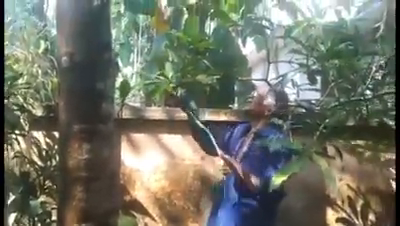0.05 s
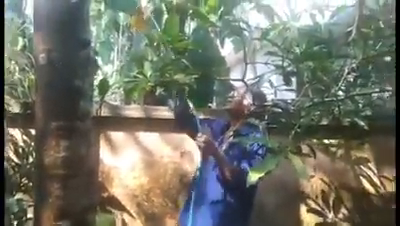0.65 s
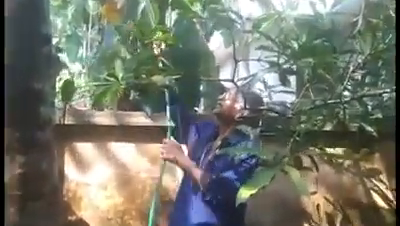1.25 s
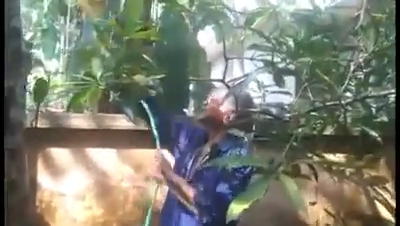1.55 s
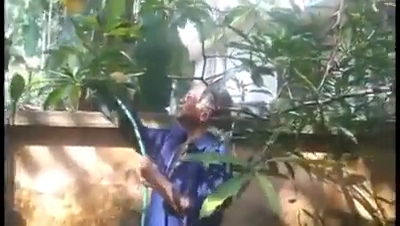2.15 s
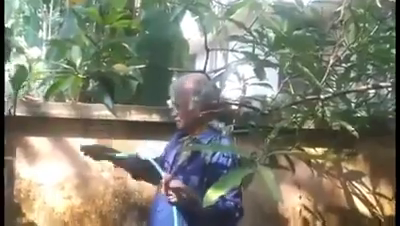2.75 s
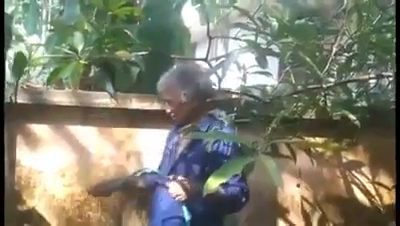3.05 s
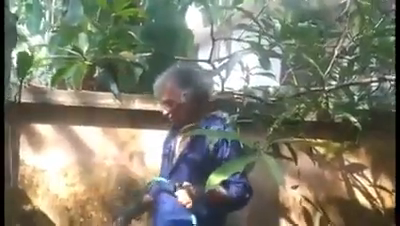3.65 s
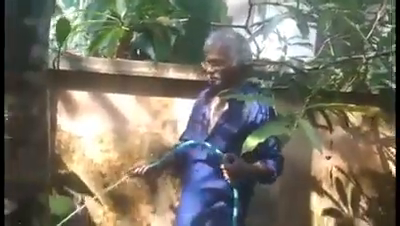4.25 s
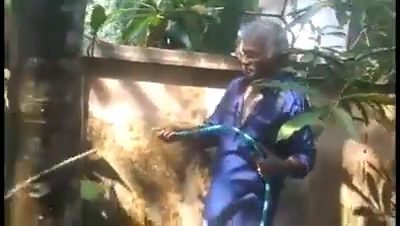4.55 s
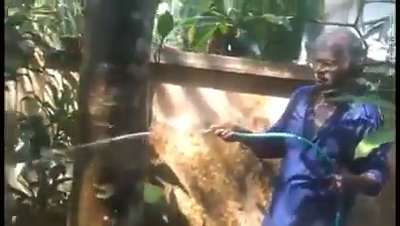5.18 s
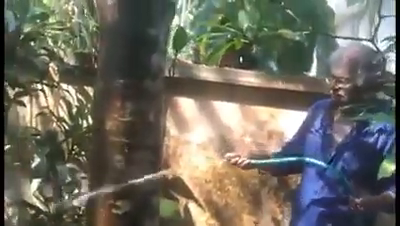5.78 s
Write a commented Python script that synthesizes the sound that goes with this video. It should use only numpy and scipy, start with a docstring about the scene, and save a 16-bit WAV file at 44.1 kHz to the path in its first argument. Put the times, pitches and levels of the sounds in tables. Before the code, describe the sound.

A hose jet sweeps across garden plants, with scattered drips and splats growing into a fuller hissing patter on foliage.

```python
"""In a garden, a thumb-pinched hose sweeps over shrubs, the ground and a tree trunk.
The spray swells on each plant and thins in the gaps; when it points high only a few drops land.
Drops patter and drum on leaves, drips plink, and lumps of water slap leaves and bark and burst
into droplets. The jet sizzles with a wandering hollow ring, over a faint outdoor rumble."""
import sys
import numpy as np
from scipy import signal
from scipy.fft import rfft, irfft
from scipy.io import wavfile

SR = 44100
rng = np.random.default_rng(int(sys.argv[2]) if len(sys.argv) > 2 else 0)


def digitize_waveform(pressure):
    """Quantize a signal to 16-bit integers and store it at the path in sys.argv[1].

    Rows of a 2-D input are taken as channels; values are limited to [-1, 1].
    """
    field = np.atleast_2d(pressure).T
    bounded = np.clip(field, -1, 1)
    quanta = np.round(bounded * 32767).astype(np.int16)
    wavfile.write(sys.argv[1], SR, quanta)


N = 265482
TIME = np.arange(N) / SR


def from_db(db):
    """Decibels to gain."""
    return 10 ** (np.asarray(db) / 20)


def rms_one(x):
    """Scale to unit power."""
    return x / np.sqrt(np.mean(x ** 2) + 1e-20)


def power_sum(*gains):
    """Unrelated sounds add in power."""
    return np.sqrt(sum(g ** 2 for g in gains))


def automation(rows):
    """One curve per column, ramped between the times in the first column."""
    times, *columns = np.transpose(rows)
    return [np.interp(TIME, times, column) for column in columns]


def drift(rate_hz):
    """Random modulation with unit power."""
    knots = rng.standard_normal(4000)
    return rms_one(np.interp(TIME * rate_hz, np.arange(len(knots)), knots))


def colour(x, spectrum):
    """Minimum-phase EQ through (frequency [Hz], gain [dB]) points."""
    hz, db = np.transpose(spectrum)
    size = 4096
    grid_hz = np.maximum(np.arange(size // 2 + 1) * SR / size, 1)
    gain = from_db(np.interp(np.log(grid_hz), np.log(hz), db))
    cepstrum = irfft(np.log(gain))
    cepstrum[1:size // 2] *= 2
    cepstrum[size // 2 + 1:] = 0
    return signal.fftconvolve(x, irfft(np.exp(rfft(cepstrum))))[:len(x)]


def resonance(x, hz, width_hz):
    """Two-pole band-pass with unity gain at its peak."""
    r = np.exp(-np.pi * width_hz / SR)
    feedback = [1, -2 * r * np.cos(2 * np.pi * hz / SR), r * r]
    return signal.lfilter(np.array([1, 0, -1]) * (1 - r * r) / 2, feedback, x + 1e-18)


def swept_resonance(x, centre_hz, width_hz):
    """A band-pass whose centre moves."""
    turn = np.exp(2j * np.pi * np.cumsum(centre_hz) / SR)
    r = np.exp(-np.pi * width_hz / SR)
    return 2 * np.real(turn * signal.lfilter([1 - r], [1, -r], x / turn))


def high_pass(x, hz, order):
    """Butterworth low cut."""
    return signal.sosfilt(signal.butter(order, hz, "high", fs=SR, output="sos"), x)


def drops(per_s, spread_db, size):
    """Clicks at random times, with random strength and polarity."""
    out = np.zeros(size)
    hits = np.flatnonzero(rng.random(size) < per_s / SR)
    weight = np.minimum(rng.exponential(1, size)[hits], 4.5)
    out[hits] = from_db(spread_db * weight) * np.where(rng.random(size)[hits] < .5, -1, 1)
    return out


def shower(spectrum, per_s, spread_db, q, clump_db, count):
    """Drops arrive in clumps and each rings briefly at one of `count` pitches."""
    pitches = np.geomspace(spectrum[0][0], min(spectrum[-1][0], SR / 3), count)
    rings = sum(resonance(drops(per_s / count, spread_db, N), hz, hz / q) for hz in pitches)
    clumps = from_db(clump_db * (0.58 * drift(90) + 0.32 * drift(24)))
    return rms_one(colour(rings, spectrum) * clumps)


# EQ of the outdoor bed: (frequency [Hz], gain [dB])
RUMBLE_EQ = [(20, -9), (35, -3), (50, 2), (66, 7.5), (100, -1.5), (150, -3.5), (250, -10.5), (500, -17.5),
             (1000, -15), (2000, -18.5), (5000, -41), (12000, -28)]
def outdoor_rumble(start_db=-72, fade_db_per_s=-0.98):
    """A faint bed of low noise that slowly dies down."""
    bed = rms_one(colour(rng.standard_normal(N), RUMBLE_EQ))
    return from_db(start_db + fade_db_per_s * TIME) * bed


def garden_echoes(x, t60):
    """Short scattered echoes from wall, trunks and leaves."""
    t = np.arange(SR // 2) / SR
    echoes = drops(3300, 0.3, len(t)) * np.exp(-np.log(1000) * t / t60) * (t > .003)
    return signal.fftconvolve(x, echoes / np.sqrt(np.sum(echoes ** 2)))[:N]


# plinks of drips and thuds of big leaves: (time [s], pitch [Hz], relative level [dB], t60 [s])
PLOPS = [(0.051, 182, -55.5, 0.47), (0.111, 269, -50.5, 0.19), (0.408, 2290, -26.5, 0.07),
         (0.42, 2390, -37, 0.12), (0.601, 192.5, -51.5, 0.21), (0.737, 3225, -28.5, 0.029),
         (0.761, 197, -58.5, 0.15), (1.002, 215, -56, 0.072), (1.178, 1450, -53, 0.14),
         (1.289, 1336, -58, 0.12), (1.317, 359, -55, 0.067), (1.705, 1670, -37.5, 0.05),
         (2.245, 174, -38, 0.042), (3.748, 585, -37.5, 0.12), (4.806, 263, -38.5, 0.14),
         (4.814, 504, -45, 0.15), (5.189, 307, -41.5, 0.16), (5.558, 340, -49, 0.088)]
def plops(rise_per_s=0.5, attack_s=0.0046):
    """A damped tone creeps up in pitch, half buried in the churn of its own splash."""
    out = np.zeros(N + SR)
    t = np.arange(SR // 4) / SR
    for s, hz, db, t60 in PLOPS:
        i = round(s * SR)
        envelope = np.exp(-np.log(1000) * t / t60) * (1 - np.exp(-t / attack_s))
        tone = np.sin(2 * np.pi * np.cumsum(hz * (1 + rise_per_s * t)) / SR)
        churn = resonance(rng.standard_normal(len(t)), hz, 60 + hz / 7)
        churn = rms_one(resonance(churn, hz, 150 + hz / 3))
        out[i:i + len(t)] += from_db(db) * envelope * (.55 * tone + .42 * churn)
    return out[:N]


# the jet's hollow ring: (time [s], upper pitch [Hz], relative level [dB], lower band re upper [dB])
JET_RING = [(3.1, 1880, -82, -6), (3.2, 1900, -49.5, 4), (3.3, 1870, -42, -6.5), (3.44, 1827, -40, -14),
            (3.54, 2090, -45, -15), (3.66, 2120, -42.5, -24), (3.72, 2120, -57, -25), (3.83, 1744, -37, -5),
            (4.02, 1820, -42, -9), (4.2, 1893, -47.5, -4.5), (4.4, 2007, -41.5, -1.5),
            (4.58, 1930, -37.5, -11), (4.66, 1900, -45, -29), (4.83, 1824, -38, -7),
            (5.33, 2020, -56.5, -8), (5.43, 1770, -44, -11), (5.53, 1950, -40.5, -9),
            (5.63, 1714, -47.5, -19), (5.82, 1840, -52, -20), (5.9, 1943, -44.5, -14), (5.95, 1860, -42, 2),
            (6.02, 1810, -46, 2)]
def jet_ring(lower_ratio=0.76, waver=.012, flutter_db=.8, flutter_hz=70):
    """The breaking jet rings in two moving bands; each wavers in pitch and flutters in level."""
    centre_hz, level_db, lower_db = automation(JET_RING)
    ring = 0
    for ratio, db in ((1, 0), (lower_ratio, lower_db)):
        fizz = drops(5000, 2.8, N)
        pitch_hz = ratio * centre_hz * (1 + waver * drift(flutter_hz))
        for width_hz in (160, 340, 600):
            fizz = swept_resonance(fizz, pitch_hz, width_hz)
        ring = ring + from_db(db + flutter_db * drift(flutter_hz)) * rms_one(fizz)
    return ring * from_db(level_db - 9.5) * (TIME > JET_RING[0][0])


# the jet on leaves, ground and bark: (peak time [s], rise [s], fall [s], level [dB], centre [Hz])
SIZZLES = [(1.61, 0.03, 0.068, -56, 3950), (3.56, 0.019, 0.026, -41, 4170),
           (3.675, 0.084, 0.034, -42.5, 4700), (4.0, 0.11, 0.033, -44, 3695), (4.6, 0.039, 0.16, -51, 4060),
           (5.72, 0.1, 0.16, -52, 3450)]
def sizzle(q=2.35):
    """Where the jet lands unbroken, a dense crackle swells in one bright band."""
    out = 0
    for s, rise_s, fall_s, db, hz in SIZZLES:
        crackle = resonance(resonance(drops(6000, 0.67, N), hz, hz / q), hz, 2 * hz / q)
        from_peak = (TIME - s) / np.where(TIME < s, rise_s, fall_s)
        out = out + rms_one(crackle) * from_db(db - 10 * from_peak ** 2)
    return out


# modes of a struck leaf: (frequency [Hz], level re the slap [dB], t60 [s])
LEAF_MODES = [(2250, -18, .045), (2620, -14, .05), (3280, -16, .045), (3950, -18, .035), (7300, -24, .04)]
def leaf_ring(t, spread_db=3.5, attack_s=.0012):
    """A leaf's modes differ from hit to hit and swell as the water spreads."""
    size = 1 + .06 * rng.standard_normal()
    ring = 0
    for hz, db, t60 in LEAF_MODES:
        polarity = rng.choice([-1, 1])
        decay = from_db(db + spread_db * rng.standard_normal() - 60 * t / t60)
        ring = ring + polarity * decay * np.sin(2 * np.pi * hz / size * t)
    return ring * (1 - np.exp(-t / attack_s))


# lumps of water hitting leaves and bark, with relative levels:
# (time [s], hit [dB], pitch [Hz], thrown patter [dB], thrown mist [dB])
SLAPS = [(.128, -31, 2170, -44, -51), (.141, -28, 4400, -43, -54), (0.3, -25, 4700, -46, -52),
         (0.411, -41, 2370, -48, -64), (.508, -32, 3330, -50, -41.5), (.544, -15, 3280, -35, -51),
         (.626, -39, 3480, -50, -64), (0.739, -41, 3320, -44.5, -69), (0.831, -48, 3020, -65, -72),
         (0.848, -31, 2430, -54, -64), (.866, -21, 7340, -51.5, -47), (.881, -24, 3130, -69, -70),
         (0.913, -40, 2540, -52, -69), (0.947, -42, 3220, -70, -76), (1.018, -39, 2700, -63, -84),
         (1.071, -31, 2380, -58.5, -56.5), (1.104, -42, 2550, -54.5, -57), (1.153, -56, 4370, -65, -57.5),
         (1.183, -41.5, 3670, -82, -84), (1.231, -52, 2450, -64, -62), (1.345, -66, 5330, -64, -67),
         (1.508, -39.5, 1930, -59.5, -82), (1.559, -37.5, 2670, -55, -81), (1.588, -26, 2830, -63, -71),
         (1.602, -36, 3920, -59, -68), (1.613, -39, 4040, -56, -68), (1.7, -42, 3900, -47.5, -51),
         (1.768, -21, 3580, -51, -47), (1.785, -20, 1800, -43, -46), (1.818, -20, 2740, -41.5, -57),
         (1.889, -23.5, 2630, -60, -72), (2.001, -26, 2700, -68, -58), (2.081, -18.5, 3970, -47, -48.5),
         (2.097, -23.5, 3670, -55, -62), (2.12, -22, 4130, -41, -40.5), (2.127, -28, 4595, -56, -56),
         (2.148, -30, 5960, -61, -58), (2.299, -27.5, 2440, -57, -71), (2.419, -23.5, 4490, -65, -47),
         (2.443, -33, 2050, -42, -41), (2.835, -44, 2500, -63, -44.5), (2.888, -19, 5360, -43, -50),
         (2.95, -43, 4200, -42, -39), (2.976, -20, 4100, -40.5, -47), (3.036, -40, 4160, -39, -44.5),
         (3.087, -23, 3150, -35.5, -46.5), (3.32, -22.5, 2400, -44.5, -63), (3.563, -26, 4210, -59, -58),
         (3.592, -22, 4730, -60, -45), (3.605, -18, 5530, -62, -52), (3.631, -19, 4500, -50, -46),
         (3.661, -13.5, 6240, -56, -42), (3.679, -14.5, 6500, -61, -40), (3.696, -18, 5450, -62, -60),
         (3.74, -10, 3500, -46, -55), (3.775, -16.5, 5600, -66, -58), (3.784, -17, 5345, -53, -56),
         (3.821, -19, 5130, -58, -59), (3.844, -19, 3005, -44, -57), (3.854, -19.5, 3150, -46, -57),
         (3.861, -12.5, 5700, -50, -58), (3.88, -32, 3500, -60, -60), (3.897, -29, 4500, -61, -55),
         (3.963, -19, 3230, -46, -60), (4.004, -24.5, 3400, -43, -40), (4.042, -20, 3986, -41, -43),
         (4.082, -40, 2590, -65, -64), (4.43, -34, 2580, -35, -36), (4.488, -24, 2890, -54, -40),
         (4.497, -24, 3040, -57, -56), (4.51, -10, 6100, -45, -46), (4.598, -17, 5380, -45, -45),
         (4.7, -27, 3230, -35.5, -35), (4.744, -26, 2690, -41, -40.5), (4.758, -24, 4150, -55, -56),
         (4.797, -22, 2700, -28, -38), (4.801, -16, 5640, -49, -29.5), (4.82, -15.5, 3280, -46, -38),
         (4.946, -29, 2520, -46, -45), (4.97, -21, 4330, -47, -47), (5.04, -28, 3100, -41.5, -68),
         (5.092, -20.5, 4180, -61, -68), (5.182, -20, 3160, -47, -40.5), (5.281, -41, 5700, -44, -44.5),
         (5.537, -21, 2240, -39.5, -62), (5.578, -42, 2150, -57, -52), (5.599, -24.5, 2940, -45, -54)]
def slaps(flow, knock_cycles=1.02, snap_s=.0004):
    """A lump of water lands: a broadband snap, a short pitched knock and the ring of the leaf."""
    out = np.zeros(N + SR)
    t = np.arange(SR // 15) / SR
    for s, db, hz, _, _ in SLAPS:
        i = round((s + .001) * SR)
        knock = np.sin(2 * np.pi * hz * t) * np.exp(-t * hz / knock_cycles)
        snap = .09 * rng.standard_normal(len(t)) * np.exp(-t / snap_s)
        free = np.interp(20 * np.log10(flow[i]), [-55, -45], [1, 0.095])  # running water damps the leaf
        out[i:i + len(t)] += from_db(db) * ((1 - free / 2) * knock + snap + free * leaf_ring(t))
    return high_pass(out[:N], 1850, order=6)


def slap_droplets(flow, decay_s=0.023):
    """Each slap bursts into a dying run of droplets that ring the leaf at its pitch and above."""
    out = np.zeros(N + SR)
    t = np.arange(SR // 5) / SR
    for s, _, hz, patter_db, _ in SLAPS:
        i = round(s * SR)
        droplets = drops(2200, 3.0, len(t))
        detune = np.exp(rng.normal(0, [.01, .05, .07, .07]))
        pitches = np.minimum(hz * np.array([1, 1.2, 1.55, 2.8]) * detune, SR / 3)
        q = np.interp(20 * np.log10(flow[i]), [-48, -40], [15, 5])  # a drenched leaf hardly rings
        rings = sum(gain * resonance(droplets, pitch, pitch / q)
                    for gain, pitch in zip((1, -.4, .4, -.15), pitches))
        out[i:i + len(t)] += from_db(patter_db) * rms_one(rings) * np.exp(-t / decay_s)
    return high_pass(out[:N], 1600, order=4)


# the steady fall of water as the aim wanders: (time [s], patter [dB], mist [dB])
STEADY_FALL = [(0, -71, -63), (.154, -48.5, -58), (.44, -55.5, -56.5), (0.524, -58, -46.5),
               (.712, -54, -53.5), (0.999, -82, -81), (1.462, -81.5, -79), (1.638, -63, -58),
               (2.3, -59, -77), (2.518, -52, -50), (2.8, -71, -55.5), (3.42, -45, -48.5),
               (3.52, -60.5, -50), (3.66, -60, -38.5), (4.3, -47.5, -48), (5.05, -57, -54),
               (5.52, -80, -58.5), (6.02, -52, -44.5)]
# dips in the gaps between plants, and one surge: (time [s], half-width [s], level change [dB])
GAPS = [(.725, 0.053, -12), (2.061, 0.017, -11), (2.37, 0.013, -4.5), (3.511, 0.026, 7), (3.717, 0.01, -13),
        (4.4, 0.075, -7.5), (4.565, 0.043, -6.5), (4.93, 0.015, -4.5), (5.421, 0.018, -14)]
# passes across a bush or the trunk, with relative levels:
# (peak time [s], rise [s], fall [s], drum [dB], drum pitch [Hz], splash [dB], patter [dB])
SWEEPS = [(0.211, 0.19, 0.15, -55.5, 358, -69, -52.5), (0.579, 0.16, 0.045, -73, 272, -67, -50.5),
          (0.858, 0.014, 0.04, -80, 300, -62.5, -68), (1.11, .015, .04, -82, 300.7, -73, -73),
          (1.62, 0.069, 0.14, -80, 329, -76.5, -56), (1.829, 0.073, 0.14, -54.5, 300, -52.5, -48),
          (2.164, 0.16, 0.16, -52, 281.3, -51, -43.5), (2.653, 0.083, 0.11, -63.5, 297, -55.5, -50.5),
          (2.881, 0.15, 0.2, -67, 301, -60.5, -55.5), (3.09, 0.046, 0.06, -54.5, 321.6, -58, -44.5),
          (3.752, 0.035, 0.033, -51.5, 279.4, -57, -41), (3.899, 0.08, 0.11, -47.5, 279.9, -49, -42),
          (4.497, 0.02, 0.081, -62, 300, -58, -43), (4.717, 0.015, 0.075, -59, 302.3, -53.5, -38),
          (4.806, 0.017, 0.091, -47, 275.4, -54, -38.5), (4.975, 0.09, 0.16, -55, 290, -58, -45.5),
          (5.204, 0.12, 0.12, -56.5, 292.1, -51.5, -40.5), (5.6, 0.15, 0.26, -69, 319, -56, -49.5),
          (5.761, 0.11, 0.094, -79, 298, -61, -48.5)]
def landing_water(lead_s=0.003, patter_decay_s=0.031, mist_decay_s=0.033, swell_curve=1.53):
    """Envelopes of drum, splash, patter and mist: a steady fall, bursts at slaps, swells on plants."""
    t = TIME[::32]
    gap_db = sum(db * np.exp(-((t - s) / width_s) ** 2) for s, width_s, db in GAPS)
    times, patter_db, mist_db = np.transpose(STEADY_FALL)
    patter = from_db(np.interp(t, times, patter_db) + gap_db)
    mist = from_db(np.interp(t, times, mist_db) + gap_db)
    for s, _, _, patter_db, mist_db in SLAPS:  # the first drops arrive just ahead of the lump
        patter_burst = np.exp(-np.abs(t - s) / np.where(t < s, lead_s, patter_decay_s))
        mist_burst = np.exp(-np.abs(t - s) / np.where(t < s, lead_s, mist_decay_s))
        patter = power_sum(patter, from_db(patter_db - 9) * patter_burst)
        mist = power_sum(mist, from_db(mist_db) * mist_burst)
    drum, splash = from_db(-30) * patter, from_db(-20) * patter  # strays on big leaves and wet ground
    for s, rise_s, fall_s, drum_db, _, splash_db, patter_db in SWEEPS:
        swell_db = gap_db - 10 * np.abs((t - s) / np.where(t < s, rise_s, fall_s)) ** swell_curve
        drum = power_sum(drum, from_db(drum_db + swell_db))
        splash = power_sum(splash, from_db(splash_db + swell_db))
        patter = power_sum(patter, from_db(patter_db - 0 + swell_db))
        mist = power_sum(mist, from_db(patter_db - 8 + swell_db))
    return [np.interp(TIME, t, gain) for gain in (drum, splash, patter, mist)]


# EQ of drops on big leaves, before varispeed: (frequency [Hz], gain [dB])
DRUM_EQ = [(110, -7), (180, -12), (270, 7.5), (400, -1), (620, 5), (900, -20), (1600, 2.5)]
def leaf_drumming(root_hz=270):
    """Big leaves drum; varispeed tunes the drumming to each plant's own leaves."""
    drum = shower(DRUM_EQ, per_s=900, spread_db=-0.5, q=23.0, clump_db=3.5, count=20)
    pitch_hz, = automation([(s, hz) for s, _, _, _, hz, _, _ in SWEEPS])
    return np.interp(np.cumsum(pitch_hz / root_hz) % N, np.arange(N), drum)


def bubbles(spectrum, per_s=110, cycles=38, low_hz=1900, high_hz=7000):
    """Trapped air rings longer than a drop, every bubble at a pitch of its own."""
    out = np.zeros(N + SR)
    t = np.arange(SR // 12) / SR
    strengths, pitch_draws = drops(per_s, 2.5, N), rng.random(N)
    for i in np.flatnonzero(strengths):
        hz = low_hz * (high_hz / low_hz) ** pitch_draws[i]
        out[i:i + len(t)] += strengths[i] * np.sin(2 * np.pi * hz * t) * np.exp(-t * hz / cycles)
    return rms_one(colour(out[:N], spectrum))


# EQs of wet surfaces, small leaves, the finest drops and fat drops: (frequency [Hz], gain [dB])
SPLASH_EQ = [(400, -32), (650, 0), (950, 5), (1400, 3.5), (2000, -1), (3200, -9)]
PATTER_EQ = [(1000, -63), (1700, -8.5), (2250, 6.5), (3300, 3), (4300, 0.5), (6000, -4.5), (10000, -35.5)]
MIST_EQ = [(1800, -45.5), (3500, 0.5), (4800, -1), (7400, 4.5), (9700, 1.5), (11000, -3.5), (13000, -4),
           (13350, -19), (15000, -8)]
TICK_EQ = [(2600, 0), (3300, 5.5), (6500, 5.5), (8000, -7.5), (12000, -12)]
def spray_on_foliage(drum_gain, splash_gain, patter_gain, mist_gain, bubble_cap_db=-55):
    """Big leaves drum, wet surfaces splash, small leaves patter, mist hisses and fat drops tick."""
    drum = leaf_drumming()
    splash = shower(SPLASH_EQ, per_s=1500, spread_db=-1.0, q=13.7, clump_db=1.5, count=24)
    patter = shower(PATTER_EQ, per_s=3000, spread_db=-0.14, q=6.3, clump_db=1.5, count=26)
    mist = shower(MIST_EQ, per_s=6500, spread_db=1.25, q=2.6, clump_db=2.1, count=12)
    ticks = shower(TICK_EQ, per_s=130, spread_db=1.6, q=4, clump_db=0, count=7)
    bubble_gain = np.minimum(patter_gain, from_db(bubble_cap_db))
    return (drum_gain * drum
            + splash_gain * from_db(3) * splash
            + patter_gain * from_db(-1.5) * patter
            + mist_gain * from_db(-1.56) * mist
            + power_sum(patter_gain, mist_gain) * from_db(-11) * ticks
            + bubble_gain * from_db(-3) * bubbles(PATTER_EQ))


# fineness of the spray: (time [s], top treble gain [dB])
FINENESS = [(0, 13.5), (.55, 8.5), (.8, -2), (1.07, 16.5), (1.3, -12), (1.6, 1), (2.0, -22), (2.17, 10),
            (2.35, 3), (2.75, -1.5), (2.95, 8.5), (3.3, 4.5), (3.7, 3), (4.6, 10.5), (5.08, -3), (5.22, 8),
            (5.7, 14.5), (6.02, 4.5)]
def atomise(x):
    """A finer spray has more air on top."""
    top_db, = automation(FINENESS)
    return x + (from_db(top_db) - 1) * resonance(x, 12740, 3200)


def leaf_reflections(x, flow, shortest_s=0.000422, longest_s=.004, sway=0.059):
    """Drifting reflections off nearby leaves comb sparse drops; a downpour averages them out."""
    depth = np.interp(20 * np.log10(flow), [-58, -44], [.34, .13])
    out, power, n = x, 1, np.arange(N)
    for delay_s in np.geomspace(shortest_s, longest_s, 10):
        lag = delay_s * SR * (1 + sway * drift(2.5))
        gain = depth * drift(6)
        out = out + gain * np.interp(n - lag, n, x)
        power = power + gain ** 2
    return out / np.sqrt(power)


# brief scoops in the hiss: (time [s], half-length [s], centre [Hz], width [Hz])
SCOOPS = [(0.238, 0.26, 2820, 250), (1.578, 0.058, 5340, 1110), (3.085, 0.031, 1760, 180),
          (3.247, .06, 2120, 200), (3.514, 0.038, 3200, 1110), (4.21, 0.13, 2410, 450.4),
          (4.646, 0.047, 2550, 750), (5.292, 0.093, 1540, 260), (5.873, 0.061, 1170, 446),
          (5.893, 0.017, 2720, 588), (6.014, 0.087, 3480, 596), (5.981, 0.061, 4850, 446)]
# a treble notch that deepens while the jet points low: (time [s], depth [0-1])
LOW_AIM_NOTCH = [(3.1, 0.01), (3.25, 0.7), (3.68, 1), (3.75, 0.25), (4.02, 0.16), (4.4, 0.31), (4.46, 0.05),
                 (4.65, 0.36), (4.8, 0)]
def hollow_out(x, notch_hz=8400, notch_width_hz=800):
    """A band sinks out of the hiss and the spray turns pipe-like; a low aim notches the treble."""
    cuts = [(np.exp(-np.minimum(np.abs(TIME - s) / half_s, 3) ** 4), hz, width_hz)
            for s, half_s, hz, width_hz in SCOOPS]
    low_aim, = automation(LOW_AIM_NOTCH)
    cuts.append((low_aim, notch_hz, notch_width_hz))
    for depth, hz, width_hz in cuts:
        for _ in range(2):
            x = x - .8 * depth * resonance(x, hz, width_hz)
    return x


# stereo width of the water: (frequency [Hz], side re mid [dB])
WIDTH_EQ = [(1000, -60), (2600, -80), (4200, -46), (5800, -10.5), (7000, -11), (8000, -19.5), (11000, -58),
            (12500, -18), (14500, -10)]
def scene():
    """Water straight ahead, its treble flickering left and right, over the low rumble."""
    drum_gain, splash_gain, patter_gain, mist_gain = landing_water()
    flow = power_sum(patter_gain, mist_gain)
    hits, droplets = slaps(flow), slap_droplets(flow)
    leaves = spray_on_foliage(drum_gain, splash_gain, patter_gain, mist_gain) + sizzle()
    spray = leaf_reflections(atomise(leaves) + droplets, flow)
    water = hollow_out(spray + jet_ring()) + hits + plops()
    water += from_db(-9.5) * garden_echoes(hits + droplets, t60=0.25)
    rumble = outdoor_rumble()
    side = colour(water * drift(600), WIDTH_EQ)
    return water + rumble + side * np.array([[1], [-1]])


def record(dry, cutoff_hz=14100):
    """Master EQ: a notch in the treble and a steep high cut."""
    notched = dry - .62 * resonance(dry, 8300, 900)
    return signal.sosfilt(signal.ellip(10, .2, 70, cutoff_hz, fs=SR, output="sos"), notched)


dry = scene()
out = record(dry)
digitize_waveform(out)
```